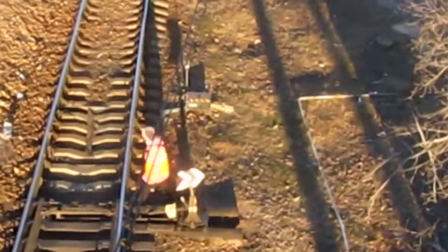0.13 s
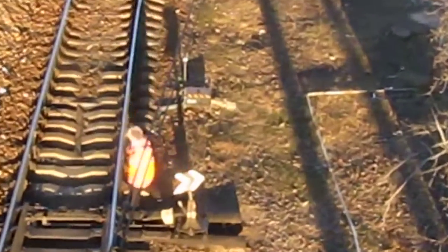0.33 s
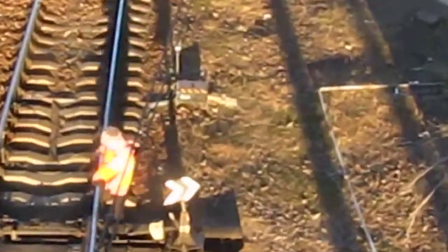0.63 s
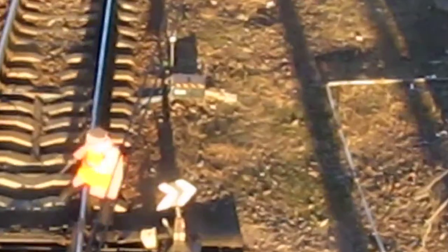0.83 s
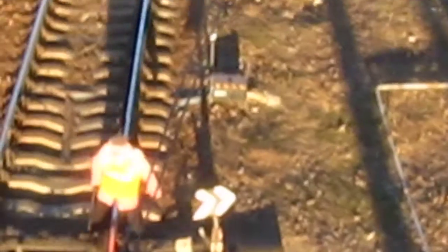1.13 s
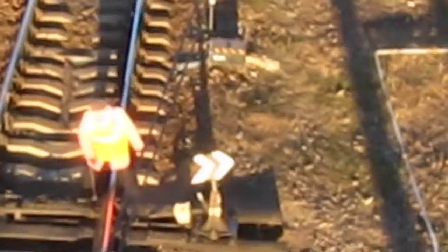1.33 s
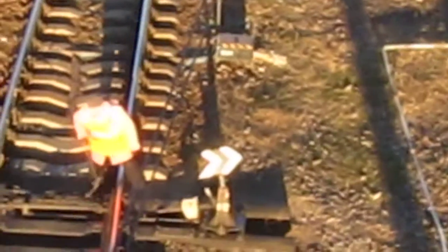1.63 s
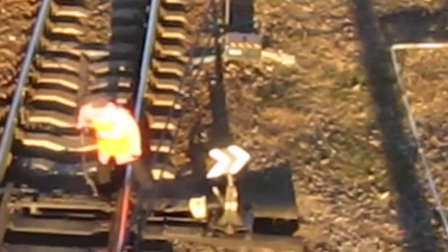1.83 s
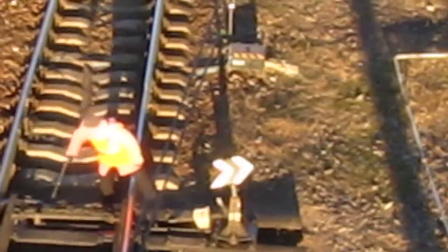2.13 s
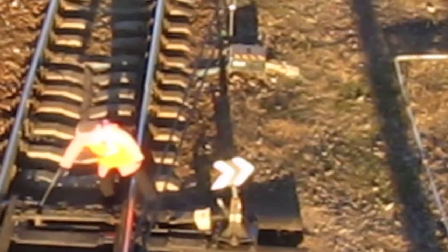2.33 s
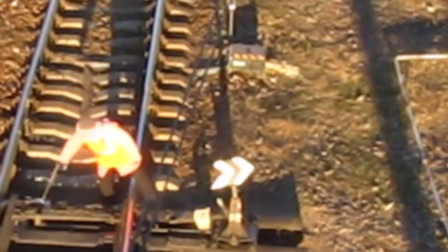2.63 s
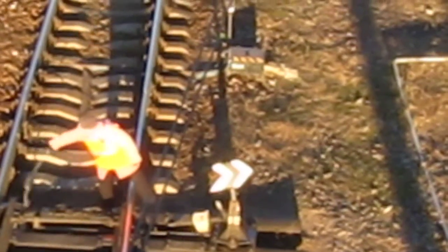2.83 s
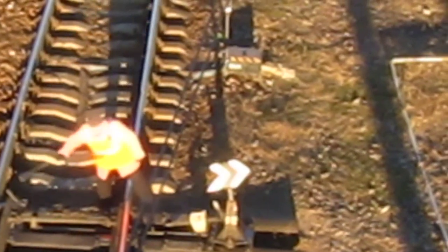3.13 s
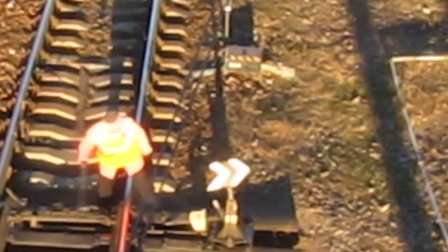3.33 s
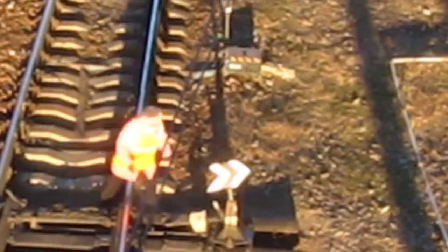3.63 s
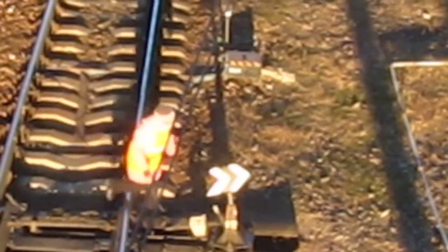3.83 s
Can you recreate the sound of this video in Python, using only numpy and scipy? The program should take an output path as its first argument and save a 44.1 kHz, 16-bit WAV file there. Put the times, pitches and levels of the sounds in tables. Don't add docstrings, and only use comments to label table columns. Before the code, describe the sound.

Metallic knocks of a worker's bar on track and ballast, mostly in the second half, with brief stone scrapes and fading rings; outdoors, low gusty wind thumps and handling clicks come first, with faint yard wash behind.

```python
import sys
import numpy as np
from scipy import signal
from scipy.fft import rfft, irfft
from scipy.io import wavfile
from scipy.ndimage import uniform_filter1d

SR = 44100
rng = np.random.default_rng(int(sys.argv[2]) if len(sys.argv) > 2 else 0)


def dump(signal):
    limited = np.clip(np.atleast_2d(signal).T, -1, 1)
    pcm = np.round(limited * 32767).astype(np.int16)
    wavfile.write(sys.argv[1], SR, pcm)


def elevation(decibels):
    levels = np.asarray(decibels, float)
    return 10 ** (levels / 20)


N = 176400

# f/Hz, spectral level/dB per Hz
SECOND_SPECTRUM = [(530, -26), (1500, -9.5), (3310, -5.5), (6460, -18.5), (7850, -15.5), (13800, -30.5),
                   (16500, -53.5)]
FOURTH_SPECTRUM = [(470, -16), (1320, -15.5), (2500, 0), (4130, -10.5), (7500, -19), (9900, -19.5),
                   (16000, -49)]


def in_time(rows):
    return np.interp(np.arange(N) / SR, *np.transpose(rows))


def rms_one(x):
    return x / np.sqrt(np.mean(x ** 2) + 1e-20)


def colour(x, points, peaky_db=0):
    hz, db = np.transpose(points)
    grid = np.maximum(np.arange(2049) * SR / 4096, 10)
    studs = uniform_filter1d((rng.random(2049) < .03) * elevation(peaky_db) * 3, size=3)
    gain = elevation(np.interp(np.log(grid), np.log(hz), db)) * (3 + studs * (peaky_db > 0))
    cepstrum = irfft(np.log(gain))
    cepstrum[1:2048] *= 2
    cepstrum[2049:] = 0
    pulse = irfft(np.exp(rfft(cepstrum)))
    unit_pulse = pulse / np.sqrt(np.sum(pulse ** 2))
    return signal.fftconvolve(x, unit_pulse)[:N]


def drift(rate_hz):
    r = np.exp(-2 * np.pi * rate_hz * 20 / SR)
    slow = signal.lfilter([1], [1, -2 * r, r * r], rng.standard_normal(N // 20 + 2002))[2000:]
    return np.interp(np.arange(N) / 20, np.arange(len(slow)), rms_one(slow))


def ring(clicks, hz, t60):
    r = elevation(-60 / (max(t60, .002) * SR))
    w = 2 * np.pi * hz / SR
    return signal.lfilter([0, np.sin(w)], [1, -2 * r * np.cos(w), r * r], clicks + 1e-18)


def dying(s, db, t60, rise_s=1e-4):
    out = np.zeros(N)
    i = int(s * SR)
    t60 = max(t60, .002)
    t = np.arange(min(N - i, int(2 * t60 * SR))) / SR
    out[i:i + len(t)] = np.minimum(t / rise_s, 1) * elevation(db - 60 * t / t60)
    return out


def grit():
    contacts_per_s, spread_db = 2900, 5.5
    size = elevation(spread_db * np.minimum(rng.exponential(1, N), 5)) * rng.choice([-1, 1], N)
    contacts = rms_one(size * (rng.random(N) < contacts_per_s / SR))
    return rms_one(contacts + rng.standard_normal(N))


def yard():
    # t/s, level/dB
    gain_curve = [(0, -47.5), (.62, -47), (1.2, -45), (1.56, -44.5), (1.66, -49.5), (2.04, -45.5),
                  (2.1, -61.5), (2.8, -51.5), (3.1, -57.5), (4, -52)]
    # f/Hz, spectral level/dB per Hz
    wash_spectrum = [(180, -33.5), (528, -5), (1810, -15.5), (4300, -30), (9800, -34.5), (12000, -45.5),
                     (16000, -52)]
    # f/Hz, level/dB
    whine_lines = [(7762, -15), (7792, -10), (7822, -13), (7852, -1.5), (7882, 0), (7912, -11), (7942, -8)]
    wash_db, whine_db = 2.5, -73
    gain_db = in_time(gain_curve)
    wash = colour(rng.standard_normal(N), wash_spectrum) * elevation(0.16 * drift(24))
    t = np.arange(N) / SR
    whine = sum(elevation(db) * np.sin(2 * np.pi * (hz * t + rng.random())) for hz, db in whine_lines)
    return elevation(gain_db + wash_db) * wash + elevation(whine_db + .8 * (gain_db + 52)) * whine


def wind():
    # f/Hz, spectral level/dB per Hz
    wind_spectrum = [(12, -30), (20, 2.5), (87, 2), (369, -16), (512, -20), (700, -40.5), (910, -54),
                     (1540, -120)]
    # t/s, level/dB
    gusts = [(0, -26), (.2, -21.5), (.6, -23.5), (.8, -27.5), (.92, -30.5), (1.05, -22.5), (1.45, -26),
             (1.7, -25), (1.85, -25.5), (2.04, -17.5), (2.1, -39.5), (2.35, -38), (2.7, -29.5),
             (2.9, -31.5), (2.97, -35.5), (3.45, -41.5), (3.6, -28.5), (4, -31)]
    # t/s, peak level/dB, length/s
    eddies = [(0.129, -17, 0.043), (0.162, -11.5, 0.076), (0.254, -8.5, 0.025), (0.363, -13.5, 0.046),
              (0.477, -11.5, 0.041), (0.525, -7.5, 0.018), (0.547, -13, 0.031), (0.603, -12.5, 0.024),
              (1.094, -16, 0.062), (1.296, -18.5, 0.035), (1.373, -13, 0.028), (1.408, -12, 0.013),
              (1.582, -6.5, 0.043), (1.638, -10, 0.048), (1.698, -10, 0.042), (1.75, -9.5, 0.028),
              (1.827, -12.5, 0.013), (1.92, -7.5, 0.045), (1.946, -11.5, 0.032), (1.977, -9, 0.016),
              (2.044, -9.5, 0.03), (2.209, -19.5, 0.027), (2.918, -10, 0.036), (3.019, -12, 0.011),
              (3.288, -21.5, 0.023), (3.597, -20.5, 0.017), (3.929, -18, 0.038), (0.495, -10.5, 0.0071),
              (1.667, -12.5, 0.013), (2.648, -23, 0.028), (2.89, -17.5, 0.035), (3.478, -23, 0.021),
              (3.581, -22, 0.017), (3.703, -20.5, 0.024), (2.486, -33, 0.024), (2.725, -24, 0.014),
              (3.83, -24.5, 0.015), (3.868, -22.5, 0.028)]
    wind_db, lumps_db, own_db = -2, 4, 4
    hz, db = np.transpose(wind_spectrum)
    edges = 18 * 2 ** np.arange(0, 6, .5)
    lumps = drift(29)
    white = rng.standard_normal((2, N + SR))
    out = 0
    for k, (a, b) in enumerate(zip(edges, edges[1:])):
        band = signal.sosfilt(signal.butter(2, [a, b], "band", fs=SR, output="sos"), white[k % 2])[SR:]
        band_db = np.interp(np.log(a * b) / 2, np.log(hz), db)
        out = out + band * elevation(band_db + lumps_db * lumps + own_db * drift(7.5))
    out = rms_one(out) * elevation(in_time(gusts) + wind_db)

    low_hz, rise = 64, 0.28
    for s, peak_db, length in eddies:
        top_hz = 240 * elevation(0.49 * (peak_db + 9.5))
        noise = rng.standard_normal(SR // 2)
        sos = np.vstack([
            signal.butter(2, np.clip(top_hz, 80, 2000), fs=SR, output="sos"),
            signal.butter(2, np.clip(2.1 * top_hz, 80, 4000), fs=SR, output="sos"),
            signal.butter(1, low_hz, "high", fs=SR, output="sos")])
        t = np.arange(SR // 4) / SR / length
        shape = np.where(t < rise, np.sin(np.pi / 2 * t / rise) ** 2, np.exp(-(t - rise) ** 2 * 2))
        puff = signal.sosfilt(sos, noise)[SR // 4:] * shape
        puff *= elevation(peak_db - 6.5) / np.sqrt(np.sum(puff ** 2) / np.sum(shape ** 2))
        i = int((s - .004) * SR)
        out[i:i + len(puff)] += puff[:N - i]
    return out


def ticks():
    # t/s, peak level/dB, low mode f/Hz, its t60/s, high mode f/Hz
    body_ticks = [
        (0.069, -35, 2580, .012, 3880),
        (0.5104, -18.5, 4800, 0.013, 7340),
        (0.606, -9.5, 1890, 0.0097, 4100),
        (1.137, -35.5, 9000, 0.0083, 10900),
        (1.773, -13, 2330, 0.0065, 10500),
        (1.801, -48, 9000, 0.0074, 11000),
    ]
    out = np.zeros(N)
    noise = rng.standard_normal(N)
    for s, db, low_hz, t60, high_hz in body_ticks:
        snap_band = [1500, min(1.4 * high_hz, 13500)]
        snap = signal.sosfilt(signal.butter(2, snap_band, "band", fs=SR, output="sos"), noise)
        touch = np.zeros(N)
        touch[int(s * SR)] = elevation(db - 5.0)
        out += dying(s, db - 5.5, 0.008) * snap
        out += ring(touch, low_hz, t60) + elevation(-4.5) * ring(touch, high_hz, 0.0072)
    return out


def drags():
    # t/s, length/s, level/dB
    scrapes = [
        (1.26, 0.094, -48),
        (1.397, 0.09, -38.5),
        (1.802, 0.022, -46),
        (2.048, 0.0095, -24.5),
        (2.683, 0.039, -53),
        (2.828, 0.017, -46),
        (3.008, 0.021, -17),
    ]
    t = np.arange(N) / SR
    push = sum(elevation(db) * np.interp(t, [s, s + 1.67 * d, s + d, s + d + 0.016], [0, 1, 1, 0])
               for s, d, db in scrapes)
    scrape = push * grit()
    return np.where(t < 2.5, colour(scrape, SECOND_SPECTRUM), colour(scrape, FOURTH_SPECTRUM))


def stones():
    # t/s, peak level/dB, f/Hz, t60/s
    knocks = [(1.829, -37, 3390, 0.085), (1.879, -35, 2400, 0.035), (1.915, -35, 3000, 0.035),
              (1.965, -34, 2800, .03), (2.209, -30, 420, 0.078), (3.018, -5.5, 2400, 0.013),
              (3.022, -16, 540, 0.03), (3.016, -21.5, 1650, 0.047), (1.457, -34.5, 1500, .05),
              (3.0305, -13, 2400, .012), (3.068, -24.5, 3960, .03), (1.979, -18.5, 800, 0.014),
              (1.642, -26, 600, .02)]
    t = np.arange(N) / SR
    return sum(dying(s, db, t60, .0012) * np.sin(2 * np.pi * hz * (t - s)) for s, db, hz, t60 in knocks)


def sways():
    # t/s, level/dB, f/Hz, t60/s, beat rate/Hz
    split_modes = [
        (2.857, -36, 2692, .5, 10.5),
        (3.003, -36, 4692, .9, 10),
        (2.857, -42, 4700, .8, 10.5),
        (2.2, -48, 3435, 1.4, 9),
        (2.2, -55, 2540, 1.5, 6),
        (3.325, -50, 2693, 2.2, 8),
        (3.325, -54, 2705, 2.2, 4),
    ]
    t = np.arange(N) / SR
    out = 0
    for s, db, hz, t60, beats in split_modes:
        swell = np.sin(np.pi * beats * (t - s))
        beating = np.sign(swell) * np.abs(swell) ** .85
        out = out + dying(s, db, t60) * beating * np.sin(2 * np.pi * hz * t)
    return out


def blows(table, modes, spectrum, crack_s, rattle_s, snap_db=-14):
    rise_s = 0.0004
    crack = sum(dying(s, db - 3, crack_s, rise_s) for s, db, _, _ in table)
    rattle = sum(dying(s, db + rattle_db, rattle_s, rise_s) for s, db, _, rattle_db in table) * grit()
    out = colour(crack * rng.standard_normal(N), spectrum)
    out += colour(rattle * elevation(1.8 * drift(40.3)), spectrum, peaky_db=10)

    s, db = max(table, key=lambda row: row[1])[:2]
    snap = dying(s, db + snap_db, 0.0047) * rng.standard_normal(N)
    out += colour(snap, [(2000, -18), (8300, 15.5), (16000, -9.5)])

    chatter_db, twin_share, flutter_db = -42, .014, 2.2
    spread_db = rng.normal(0, 2, (len(table), len(modes), 2))
    for k, (hz, db, t60) in enumerate(modes):
        pair = 0
        for twin in range(2):
            clicks = elevation(chatter_db) * rattle
            for (s, peak_db, ring_db, _), own_db in zip(table, spread_db[:, k, twin]):
                clicks[int(s * SR)] += elevation(peak_db + ring_db + own_db)
            split = twin * twin_share * rng.uniform(-0.88, 1) * min(1, 0.218 / t60)
            pair = pair + elevation(db - 1.2 * twin) * ring(clicks, hz * (1 + split), t60)
        around_mode = signal.butter(1, [.9 * hz, 1.1 * hz], "band", fs=SR)
        out += signal.lfilter(*around_mode, pair) * elevation(flutter_db * drift(22))
    return out


def first_spot():
    # t/s, peak level/dB, ring level/dB, rattle level/dB (both relative to the peak)
    hits = [
        (1.3515, -32, -6, -25.5),
        (1.4564, -22, -8, -14.5),
        (1.4787, -37.5, -8, -21),
        (1.5293, -40, -19, -17),
        (1.6376, -47, -13, -15),
    ]
    # f/Hz, level/dB, t60/s
    modes = [(2530, -12, .15), (3343, -3, .12), (3505, -8, .15), (4221, -8, .12), (4780, -13, .2),
             (5190, -16, .55), (6000, -13, .25), (6541, -13, .18), (7687, -12, .15), (8156, -13, .2),
             (8500, -6, .06), (9345, -17, .25), (10640, -24, .4)]
    # f/Hz, spectral level/dB per Hz
    spectrum = [(1000, -27), (3400, -2.5), (5540, -11.5), (8490, -8.5), (11000, -18.5), (16000, -46)]
    return blows(hits, modes, spectrum, crack_s=0.079, rattle_s=0.44)


def second_spot():
    # t/s, peak level/dB, ring level/dB, rattle level/dB (both relative to the peak)
    hits = [
        (1.8287, -44, -18, -10),
        (1.9118, -30.5, -16, -22),
        (2.0648, -9.5, -14, -33.5),
        (2.158, -43.5, -11, -9),
        (2.1950, -23.5, -6, -24),
        (2.5885, -37.5, -16, -17.5),
        (2.6047, -35.5, -30, -42),
        (2.7227, -39.5, -33, -22),
    ]
    # f/Hz, level/dB, t60/s
    modes = [(3429, -2, .09), (3332, -4, .17), (3440, -24, .5), (2540, -26, .45), (4080, -15, .15),
             (4500, -14, .08), (5405, -15, .1), (7090, -12, .1), (7628, -7, .08), (8250, -15, .13),
             (13450, -28, .17), (10090, -24, .2), (10640, -23, .35), (11800, -14, .05)]
    return blows(hits, modes, SECOND_SPECTRUM, crack_s=0.071, rattle_s=0.81, snap_db=11.0)


def third_spot():
    # t/s, peak level/dB, ring level/dB, rattle level/dB (both relative to the peak)
    hits = [
        (2.8612, -27, -8, -7.5),
        (2.9578, -35.5, -31.5, -7),
    ]
    # f/Hz, level/dB, t60/s
    modes = [(2885, -8, .2), (3122, -10, .15), (3644, -11, .15), (3957, -14, .3), (4705, -10, .1),
             (5195, 0, .06), (5195, -9, .8), (5975, -10, .35), (6568, -13, .17), (7558, -14, .2),
             (8376, -20, .2), (9318, -13, .2), (10630, -20, .15)]
    # f/Hz, spectral level/dB per Hz
    spectrum = [(880, -58), (1500, -7.5), (5330, 1), (6890, -16), (9650, -5.5), (16000, -56)]
    return blows(hits, modes, spectrum, crack_s=0.048, rattle_s=0.21)


def fourth_spot():
    # t/s, peak level/dB, ring level/dB, rattle level/dB (both relative to the peak)
    hits = [
        (3.0175, -34, -12, -44),
        (3.0298, -10.5, -12, -34),
        (3.0694, -33, -10, -42),
        (3.1252, -34, -6.5, -19),
        (3.2121, -35.5, -8, -19.5),
    ]
    # f/Hz, level/dB, t60/s
    modes = [(1744, -20, .15), (2697, 3.5, .22), (2616, -9, .12), (2848, -2, .09), (3214, -16, .15),
             (3967, -11, .1), (5300, -25, .3), (6234, -22, .25), (6545, -22, .3), (8705, -13, .07),
             (9803, -9, .04), (9830, -27, .5), (11310, -36, .55)]
    return blows(hits, modes, FOURTH_SPECTRUM, crack_s=0.037, rattle_s=0.82)


def scene():
    surroundings = yard() + wind() + ticks()
    tip = drags() + stones()
    steel = sways() + first_spot() + second_spot() + third_spot() + fourth_spot()
    return (surroundings + tip + steel)[None]


def top_cut(x):
    return signal.sosfilt(signal.butter(12, 16640, fs=SR, output="sos"), x)


def record(dry):
    limited = np.tanh(dry)
    heard = signal.sosfilt(signal.butter(4, 16200, fs=SR, output="sos"), limited)
    return top_cut(heard)


dry = scene()
out = record(dry)
dump(out)
```